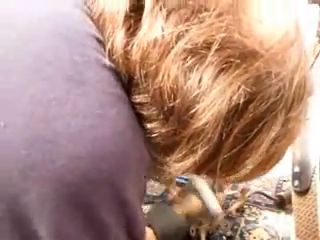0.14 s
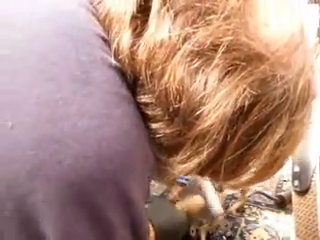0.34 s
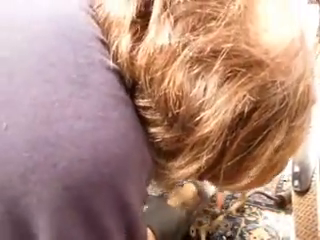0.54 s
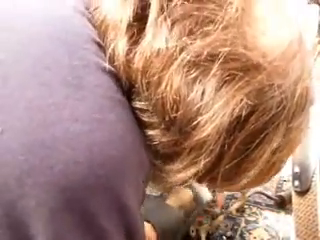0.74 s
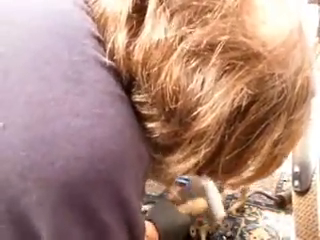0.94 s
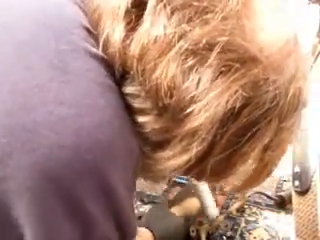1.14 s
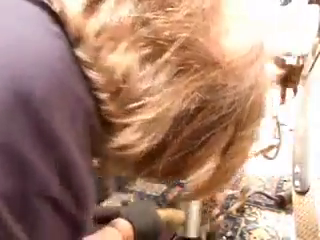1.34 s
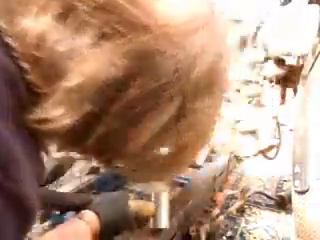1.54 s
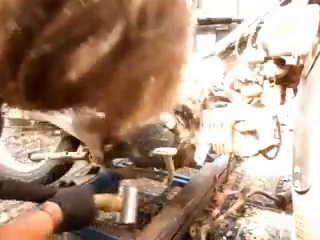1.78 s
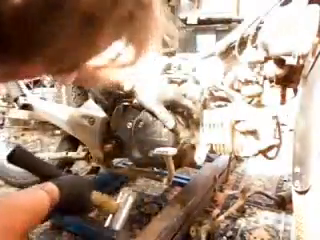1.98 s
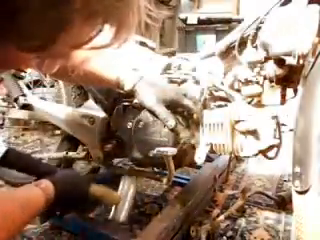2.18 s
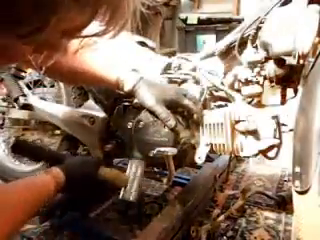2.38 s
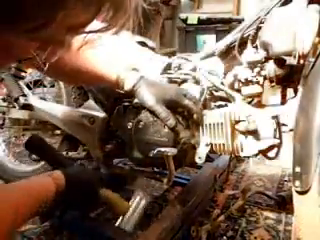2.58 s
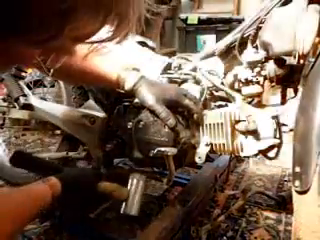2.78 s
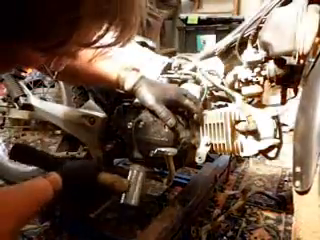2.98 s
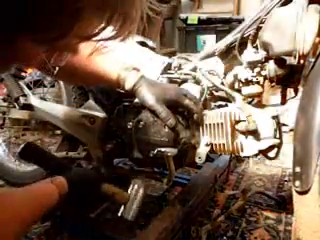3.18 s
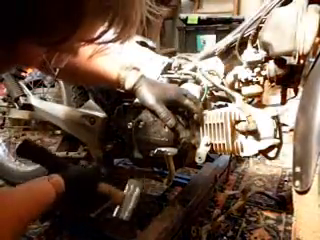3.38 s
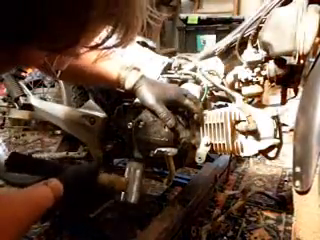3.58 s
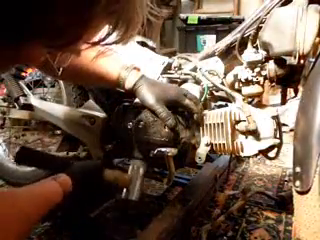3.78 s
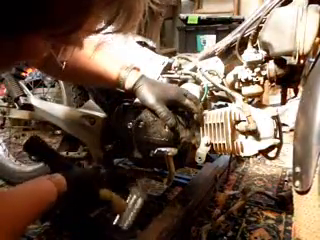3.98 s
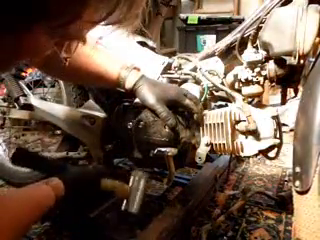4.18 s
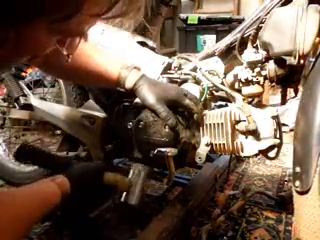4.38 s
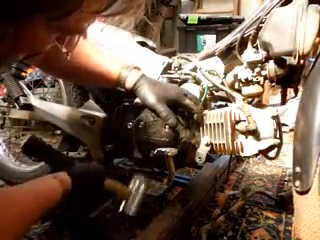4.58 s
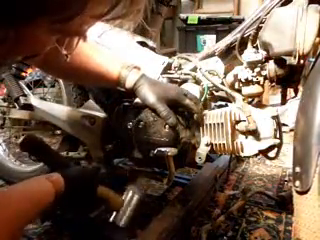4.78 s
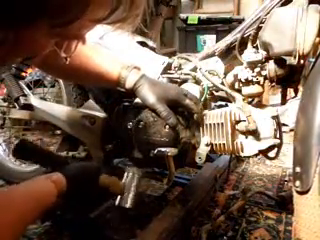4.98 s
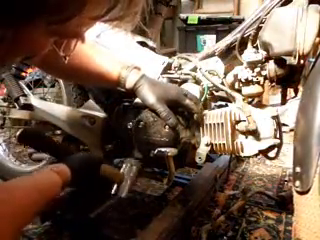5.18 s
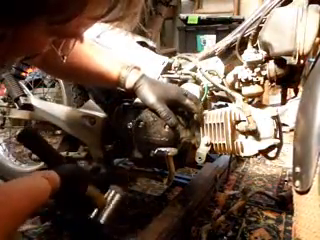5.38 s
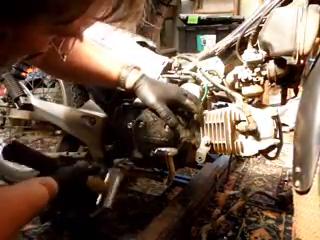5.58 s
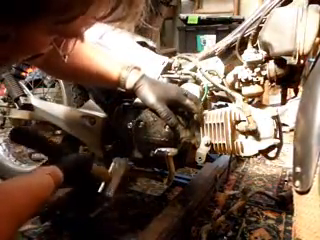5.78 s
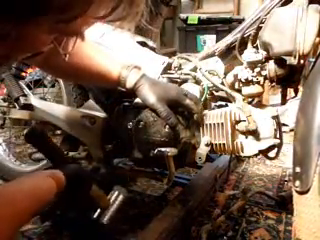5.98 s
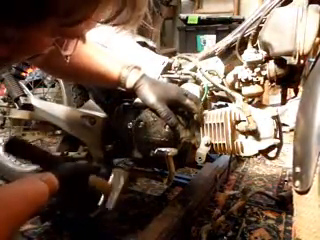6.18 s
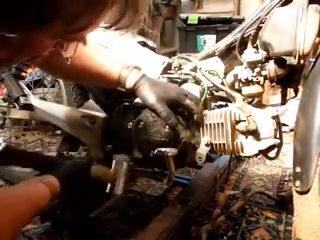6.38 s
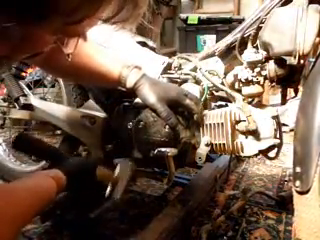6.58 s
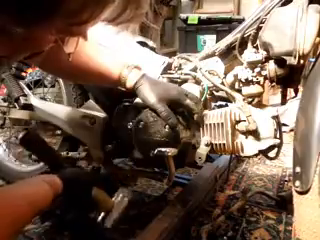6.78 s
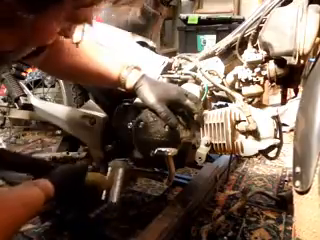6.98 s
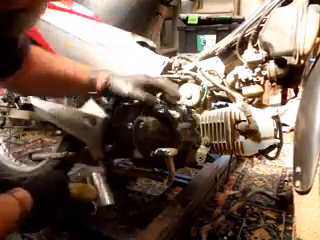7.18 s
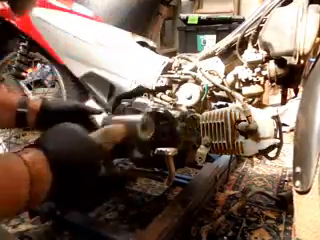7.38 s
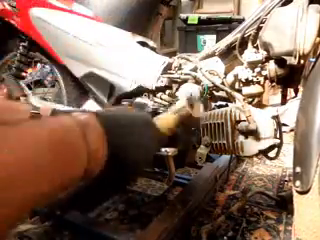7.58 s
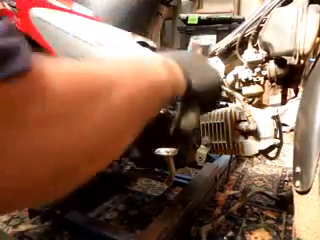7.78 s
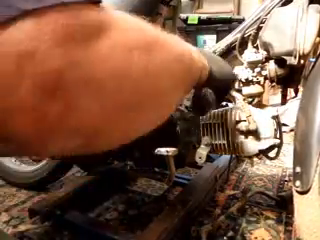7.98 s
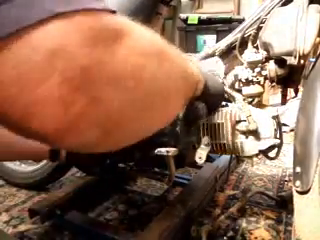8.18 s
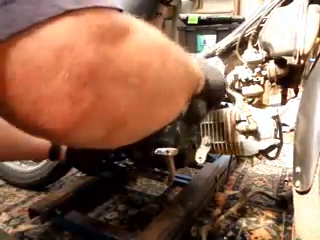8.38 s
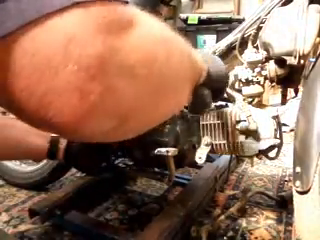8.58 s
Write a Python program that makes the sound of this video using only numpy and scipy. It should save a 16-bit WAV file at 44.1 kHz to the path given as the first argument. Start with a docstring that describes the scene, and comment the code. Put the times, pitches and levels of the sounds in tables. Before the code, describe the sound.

In a small garage, very close, a mallet hits a motorcycle engine cover. From 0.07 to 1.2 seconds come five deep, hard blows, about 0.3 seconds apart, the last loudest and less bright. A pause follows, with a soft cluster of loose metal knocks near 1.65. At 2.3 a duller, heavy blow restarts the work; from 2.6 to 3.4 four loud, hollow blows distort the microphone. A glancing bright steel clink sounds at 3.7, then lighter, clankier blows continue to 5.7, with low air buffeting around 2.5 to 5. From 6 to 7.1 the knocks turn dull and solid, with a small double hit at 6.25. Blows stop; a sleeve rustles from 7.4 to 8. One last crisp blow at 8.4 rings briefly, followed by faint knocks. Quiet hiss and low rumble persist, with short, dense echoes.

```python
"""In a small garage a mallet taps a motorcycle engine cover, about 3.5 blows a second, in two runs and a last one.
Each blow sums a noise crack, decaying cover and frame modes and diffuse echoes; the close microphone overloads.
The spot struck colours the blow's lows and mids, and the sharpness of the contact sets its treble.
Soft knocks and glancing rings are further decaying modes, heard mostly between and beside the blows.
Shaped noise makes the hiss, the rumble, the air buffeting in the long run and a sleeve before the last blow."""
import sys
import numpy as np
from scipy import signal
from scipy.fft import rfft, irfft, next_fast_len
from scipy.io import wavfile

SR = 44100
rng = np.random.default_rng(int(sys.argv[2]) if len(sys.argv) > 2 else 0)


def waveform_to_disk(signal):
    """Save audio, clipped to [-1, 1], as 16-bit WAV at the path in sys.argv[1]."""
    frames = np.transpose(np.atleast_2d(signal))
    scaled = np.clip(frames, -1, 1) * 32767
    samples = np.round(scaled).astype(np.int16)
    wavfile.write(sys.argv[1], SR, samples)


N = 380583
EVENT_SAMPLES = 32768  # length of one blow, knock or ring
AGE = np.arange(EVENT_SAMPLES) / SR  # seconds since the event began
TOP_HZ = 12150  # cutoff of the microphone's treble
THUMP_DB_PER_DB = 0.43  # a harder blow is shorter, so its thump lags behind its force
CRACK_DB_PER_DB = 0.45  # share of the sharpness that reaches the crack below the top treble

# Signs with which a side signal enters the left and right channel.
SIDES = np.array([[1], [-1]])
# All spectra are relative: their noise is scaled to rms 1 before its level is set.
# Spectrum of the garage's rumble. Each row: frequency in Hz, density in dB per Hz.
RUMBLE_SPECTRUM = [(20, -3), (48, 5), (80, -3), (125, -2.5), (200, -12.5), (400, -51), (1000, -72)]
# Course of the rumble. Each row: time in seconds, level in dB.
RUMBLE_LEVEL = [(0, -50), (2.2, -44.5), (5.3, -44.5), (6.4, -39), (7.4, -40), (8.63, -39.5)]
# Spectrum of moving air at the microphone. Each row: frequency in Hz, density in dB per Hz.
BUFFET_SPECTRUM = [(20, -0.5), (50, 4), (100, 0.5), (170, -6.5), (280, -19), (450, -54), (1000, -72)]
# Course of the buffeting. Each row: time in seconds, level in dB.
BUFFET_LEVEL = [(2.2, -65), (2.55, -37), (2.85, -29), (3.35, -27.5), (3.8, -35), (4.2, -27), (4.5, -41),
                (4.9, -37), (5.4, -69)]
# Spectrum of the hiss, also used for the scuff. Each row: frequency in Hz, density in dB per Hz.
HISS_SPECTRUM = [(100, 0.5), (300, 6), (500, 7), (700, 3.5), (1200, -0.5), (2000, -1), (4000, -4.5),
                 (8000, -5.5), (12000, -7)]
# Spectrum of the hiss that differs between channels. Each row: frequency in Hz, density in dB per Hz.
HISS_SIDE_SPECTRUM = [(200, 26), (1000, 12), (3800, 18), (5000, -16)]
# Course of the hiss. Each row: time in seconds, level in dB.
HISS_LEVEL = [(0, -38), (1.0, -41), (1.9, -32), (2.6, -32), (3.65, -40.5), (5.35, -48), (6.2, -43.5),
              (7.3, -44), (8.4, -32)]
# Spectrum of rubbing cloth. Each row: frequency in Hz, density in dB per Hz.
CLOTH_SPECTRUM = [(500, -12), (1400, -13), (1850, -4), (2500, -12.5), (6500, -10.5), (9000, -3.5),
                  (11500, 1)]
# Slides of the sleeve as the arm reaches over. Each row: start in seconds, length in seconds, peak in dB.
SLEEVE_SLIDES = [(7.375, 0.18, -34.5), (7.514, 0.54, -29)]
# Soft knocks against loose parts. Each row: start in seconds, level in dB.
KNOCKS = [(1.494, -36), (1.641, -16), (1.652, -20.5), (1.694, -20.5), (1.879, -31.5), (1.965, -33),
          (5.268, -37), (8.525, -24.5), (8.598, -21)]
# Nominal modes of the loose parts. Each row: frequency in Hz, level in dB, t60 in seconds.
LOOSE_MODES = [(383, -4.5, 0.23), (421.5, -2, 0.18), (552, -12, 0.79), (787, -8.5, 0.12),
               (940, -7.5, 0.086), (2492, -21, 1.15), (3050, -21, 0.87), (4301, -22, 0.81),
               (5103, -25, 0.72), (9588, -20, 0.33), (10140, -19, 0.4), (10500, -17, 0.45)]
# Neighbouring parts set ringing. Each row: start in seconds, frequency in Hz, nominal level in dB, t60 in seconds.
RINGS = [(2.283, 6000, -26, 0.14), (2.283, 5000, -28, .14), (6.2447, 1180, -23, 0.16),
         (6.244, 1900, -35, .3), (6.2631, 749, -18.5, 0.38), (8.4, 5870, -12, 0.12),
         (8.399, 6470, -16, 0.2), (8.399, 6730, -17, .14)]
# Glances of the mallet off bare steel. Each row: start in seconds, level in dB.
CLINKS = [(3.6935, -12)]
# Nominal modes of the steel. Each row: frequency in Hz, level in dB, t60 in seconds.
STEEL_MODES = [(2330, -2.5, 0.3), (2360, 0, 0.21), (2530, 5, 0.042), (2950, -6, 0.099), (3230, 4, 0.073),
               (4420, -4, 0.11), (4830, -1, 0.1), (5360, -7.5, 0.23)]
# Blows on the cover. Each row: start in seconds, force in dB, sharpness of contact in dB, spot struck.
BLOWS = [(0.0687, 4, 0.5, "deep"), (0.3731, 2.5, 0.5, "deep"), (0.6499, -0.8, -0.5, "deep"),
         (0.942, 1.5, 0.5, "deep"), (1.1967, 6.5, -6, "deep"), (2.2752, 5, -14, "rim"),
         (2.5801, 8.5, 2, "hollow"), (2.8567, 8, 1, "hollow"), (3.145, 5, 0.5, "hollow"),
         (3.4296, 5.5, 0, "hollow"), (3.6931, -5, 4.5, "rim"), (3.7308, -1, -8.5, "rim"),
         (3.9838, -14.5, -14, "dull"), (3.9932, 2.5, -0.5, "clanky"), (4.2676, 0, 2.5, "clanky"),
         (4.544, -2.5, 1.5, "clanky"), (4.8206, -3, 3.5, "clanky"), (5.118, -4, 1.5, "clanky"),
         (5.3934, -4, -5.5, "rim"), (5.6963, -5, -9, "clanky"), (5.9787, 0, -2, "dull"),
         (6.2443, -8.5, -16, "rim"), (6.2629, -4.5, -5, "dull"), (6.527, 2.3, -3, "dull"),
         (6.802, 2, -2.5, "dull"), (7.0718, 0.9, -2, "dull"), (8.3905, -0.9, -3, "rim")]
# Answer of each spot. Each entry: thump in dB, knock in dB, clank in dB, crack in dB.
SPOTS = {"deep": (8, 2, -1, -0.5), "hollow": (2.3, 3.1, 3.3, 0.37), "clanky": (1.5, 0.2, 3.5, 0),
         "dull": (1.7, -1.8, -1.9, -1.2), "rim": (1.5, -3, -2, 3)}
# Spectrum of the hard contact. Each row: frequency in Hz, density in dB per Hz.
CRACK_SPECTRUM = [(250, -18), (700, -0.5), (1700, 4), (2600, -2.5), (5000, 0.5), (7200, 0.5), (9500, -3.5),
                  (12000, -1.5)]
# Spectrum of the contact noise that differs between channels. Each row: frequency in Hz, density in dB per Hz.
SIDE_CRACK_SPECTRUM = [(250, 1), (600, 8), (1200, 8), (2200, 9), (3600, 3), (5000, -16), (12000, 0)]
# Nominal modes of the cover, damped by a hand. Each row: frequency in Hz, relative level in dB, t60 in seconds.
COVER_MODES = [(532, -3.5, 0.041), (666, 3, 0.029), (924, -11, 0.049), (1098, -2, 0.036),
               (1238, -3.5, 0.034), (1595, 0, 0.022), (1835, -3.5, 0.027), (2180, -15, 0.017)]
# Nominal modes of engine and frame. Each row: frequency in Hz, relative level in dB, t60 in seconds.
FRAME_MODES = [(104.4, -10.5, 0.57), (154.7, -8.5, 0.44), (223.4, -13, 0.42), (284.3, -4.5, 0.23),
               (387.7, -4.5, 0.38), (409.2, 2.5, 0.28), (465.3, -5.5, 0.7), (499, -4.5, 0.37),
               (556, -13, 1), (582, -1.5, 0.3), (612.7, -0.5, 0.22), (647, -4, 0.28), (707, -5.5, 0.41),
               (782, 0.5, 0.28), (833, -0.5, 0.19), (870, 0.5, 0.17), (1050, -15.5, 0.48), (1174, 0, 0.16),
               (1424, -9, 0.23), (1525, -14, 0.36)]
# Spectrum of the garage's echoes. Each row: frequency in Hz, density in dB per Hz.
GARAGE_SPECTRUM = [(50, -19), (110, -6.5), (200, -8.5), (450, -1.5), (800, -6), (1200, -10), (1900, -14),
                   (3800, -15), (5800, -14.5), (7500, -11.5), (9500, -15.5), (11500, -14.5)]
# Echo build-up and decay by band. Each row: centre in Hz, rise time constant in seconds, t60 in seconds.
GARAGE_TIMES = [(100, 0.0037, 0.44), (504, 0.0043, 0.44), (1500, 0.00093, 0.32), (7000, 0.00074, 0.26),
                (12000, 0.0015, 0.23)]


def undb(db):
    """Logarithmic level: 20 dB is a factor of ten in amplitude."""
    return 10 ** (np.asarray(db) / 20)


def unit(x):
    """Normalization: divide by the root mean square, so that it becomes 1."""
    return x / np.sqrt(np.mean(x ** 2))


def fade(t60):
    """Exponential damping: the amplitude loses 60 dB in t60 seconds."""
    return np.exp(-np.log(1000) * AGE / t60)


def rise(seconds):
    """Exponential build-up: the amplitude nears 1 with this time constant."""
    return 1 - np.exp(-AGE / seconds)


def along(points, hz):
    """Logarithmic pitch axis: (Hz, value) points are interpolated over log frequency."""
    f, value = np.transpose(points)
    return np.interp(np.log(hz + 1), np.log(f), value)


def noise(points, size):
    """Spectral shaping: white noise is weighted by (Hz, dB) points and scaled to rms 1."""
    n = next_fast_len(size, True)
    gain = undb(along(points, np.fft.rfftfreq(n, 1 / SR)))
    shaped = irfft(rfft(rng.standard_normal(n)) * gain, n)
    return unit(shaped[:size])


def colour(x, points):
    """Minimum phase: a folded cepstrum makes the filter causal, so an attack stays sharp."""
    n = 2 * len(x)
    gain = undb(along(points, np.fft.rfftfreq(n, 1 / SR)))
    cepstrum = irfft(np.log(gain))
    cepstrum[1:n // 2] *= 2
    cepstrum[n // 2 + 1:] = 0
    response = np.exp(rfft(cepstrum))
    return irfft(rfft(x, n) * response)[:len(x)]


def ring(modes, scatter_db, detune):
    """Modal superposition: damped sines add up, with levels and pitches drawn anew at each call."""
    out = 0
    for hz, db, t60 in modes:
        level_draw, pitch_draw = rng.standard_normal(2)
        mode_hz = hz * (1 + detune * pitch_draw)
        sine = np.sin(2 * np.pi * (mode_hz * AGE + rng.random()))
        out = out + undb(db + scatter_db * level_draw) * fade(t60) * sine
    return out


def add(track, s, sound):
    """Linear superposition: a sound is summed into the track from time s in seconds."""
    start = int(s * SR)
    track[..., start:start + EVENT_SAMPLES] += sound[..., :N - start]


def waver(depth_db, top_hz):
    """Random modulation: a gain wanders by depth_db rms, mostly slower than top_hz."""
    return undb(depth_db * noise([(top_hz, 0), (2 * top_hz, -24), (10 * top_hz, -120)], N))


def curve(rows):
    """Level envelope: (s, dB) points are joined by straight lines in dB."""
    s, db = np.transpose(rows)
    return undb(np.interp(np.arange(N) / SR, s, db))


def swell(start, length):
    """Half-sine envelope: one movement of the arm rises and falls smoothly."""
    progress = (np.arange(N) / SR - start) / length
    return np.sin(np.pi * np.clip(progress, 0, 1))


def hiss(side_db=-15):
    """Mid-side summation: steady noise is shared, and a weaker noise enters with opposite signs."""
    side = undb(side_db) * noise(HISS_SIDE_SPECTRUM, N) * SIDES
    return curve(HISS_LEVEL) * (noise(HISS_SPECTRUM, N) + side)


def rumble(side_db=-11):
    """Amplitude modulation: low noise, mostly common to both channels, is made unsteady."""
    side = undb(side_db) * noise(RUMBLE_SPECTRUM, N) * SIDES
    low = noise(RUMBLE_SPECTRUM, N) + side
    return curve(RUMBLE_LEVEL) * waver(depth_db=2.5, top_hz=6.6) * low


def buffeting():
    """Incoherent pressure: air strikes each microphone port with its own low noise, in common gusts."""
    ports = np.array([noise(BUFFET_SPECTRUM, N) for _ in range(2)])
    return curve(BUFFET_LEVEL) * waver(depth_db=3.0, top_hz=8) * ports


def sleeve():
    """Sliding friction: uneven cloth noise follows the arm's movements."""
    cloth = waver(depth_db=0.5, top_hz=25) * noise(CLOTH_SPECTRUM, N)
    sliding = sum(undb(db) * swell(start, length) for start, length, db in SLEEVE_SLIDES)
    return sliding * cloth


def soft_knocks(scuff_db=-4, scuff_t60=0.44, soft_t60=0.0023):
    """Soft contact: loose modes and a scuff that hangs in the room begin gradually."""
    out = np.zeros(N)
    for s, db in KNOCKS:
        scuff = undb(scuff_db) * noise(HISS_SPECTRUM, EVENT_SAMPLES) * fade(scuff_t60)
        parts = ring(LOOSE_MODES, scatter_db=1.5, detune=0.0038)
        add(out, s, undb(db) * (parts + scuff) * (1 - fade(soft_t60)))
    return out


def ringing_parts():
    """Single resonance: a glancing blow leaves one damped mode, whose level wanders at random."""
    out = np.zeros(N)
    for s, hz, db, t60 in RINGS:
        # a slow random modulation makes the level uneven
        wander = 1 + 0.23 * noise([(30, -9), (90, -15), (400, -100)], EVENT_SAMPLES)
        add(out, s, wander * ring([(hz, db, t60)], scatter_db=-2.0, detune=0))
    return out


def steel_clinks():
    """Modal ringing: bare steel answers a glance of the mallet with bright damped modes."""
    out = np.zeros(N)
    for s, db in CLINKS:
        add(out, s, undb(db) * ring(STEEL_MODES, scatter_db=0.5, detune=0.001))
    return out


def reverberation():
    """Diffuse decay: dense noise echoes build up and die by band; lows come late, treble dies first."""
    spectrum = rfft(noise(GARAGE_SPECTRUM, EVENT_SAMPLES))
    hz = np.fft.rfftfreq(EVENT_SAMPLES, 1 / SR)
    centres = np.array(GARAGE_TIMES)[:, 0]
    out = 0
    for (_, rise_s, t60), band in zip(GARAGE_TIMES, np.eye(len(centres))):
        # overlapping band weights sum to one at every frequency
        share = along(np.column_stack([centres, band]), hz)
        out = out + irfft(spectrum * share) * rise(rise_s) * fade(t60)
    return out


def crack(spectrum, level_db=3.0, t60=0.021):
    """Impulsive contact: a hard blow excites a broad spectrum, here briefly decaying noise."""
    return undb(level_db) * noise(spectrum, EVENT_SAMPLES) * fade(t60)


def cover(clank_db, level_db=-6):
    """Modal excitation: a spot that clanks drives the cover's upper modes harder than the lower ones."""
    struck = [(hz, db + along([(750, 0), (1500, clank_db)], hz), t60) for hz, db, t60 in COVER_MODES]
    return undb(level_db) * ring(struck, scatter_db=0.83, detune=0.01)


def frame(level_db=-20, rise_s=0.0037):
    """Coupled resonance: engine and frame take up the blow gradually and ring on."""
    return undb(level_db) * rise(rise_s) * ring(FRAME_MODES, scatter_db=2.0, detune=0.0025)


def spot_tone(force_db, sharp_db, spot):
    """Contact spectrum: the spot colours lows and mids, the sharpness of contact sets the treble."""
    thump_db, knock_db, clank_db, snap_db = SPOTS[spot]
    low_db = thump_db - THUMP_DB_PER_DB * force_db
    bright_db = snap_db + CRACK_DB_PER_DB * sharp_db
    return [(110, low_db), (400, 0.0044), (750, 0), (1050, knock_db), (1550, clank_db),
            (2000, clank_db), (3200, bright_db), (6800, bright_db), (9000, sharp_db)]


def mallet(garage_db=-10.5, alike=0.39, side_db=-25):
    """Impact response: each blow sums crack, cover, frame and garage, then takes the spot's tone."""
    out = np.zeros((2, N))
    common_echoes = reverberation()
    for s, force_db, sharp_db, spot in BLOWS:
        clank_db = SPOTS[spot][2]
        # the echo pattern partly repeats (alike, a share of power) and partly changes with each blow
        pattern = np.sqrt(alike) * common_echoes + np.sqrt(1 - alike) * reverberation()
        echoes = undb(garage_db) * pattern
        body = crack(CRACK_SPECTRUM) + cover(clank_db) + frame() + echoes
        blow = colour(body, spot_tone(force_db, sharp_db, spot))
        # a weak noise burst enters the two channels with opposite signs
        side = undb(side_db) * crack(SIDE_CRACK_SPECTRUM) * SIDES
        add(out, s, undb(force_db) * (blow + side))
    return out


def scene():
    """Superposition: background, small hits and blows add; the work is straight ahead of the microphone."""
    background = hiss() + rumble() + buffeting() + sleeve()
    small_hits = soft_knocks() + ringing_parts() + steel_clinks()
    return background + small_hits + mallet()


def record(dry, ceiling=1.0):
    """Overload and band limit: the microphone clips flat at the ceiling, then the top is cut steeply."""
    clipped = np.clip(dry, -ceiling, ceiling)
    lowpass = signal.firwin(255, TOP_HZ, fs=SR, window=("kaiser", 7))
    return signal.fftconvolve(clipped, lowpass[None], mode="same", axes=1)


dry = scene()
out = record(dry)
waveform_to_disk(out)
```